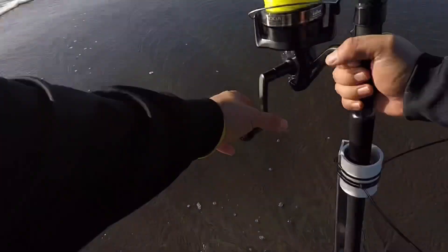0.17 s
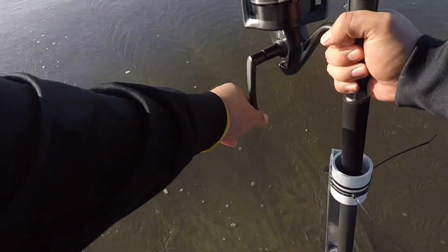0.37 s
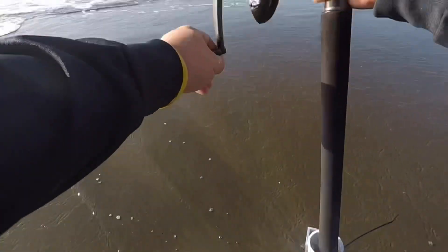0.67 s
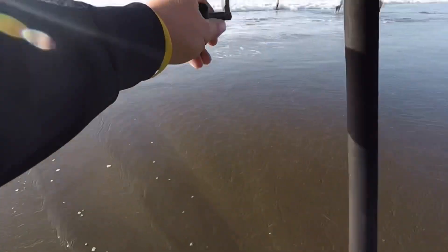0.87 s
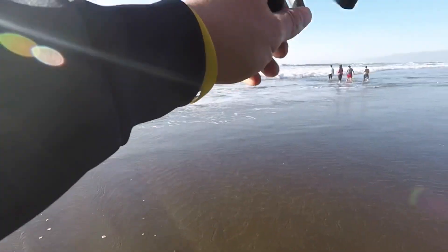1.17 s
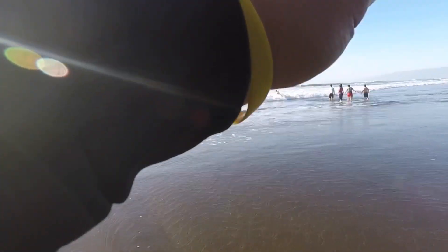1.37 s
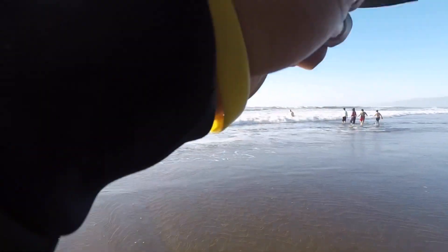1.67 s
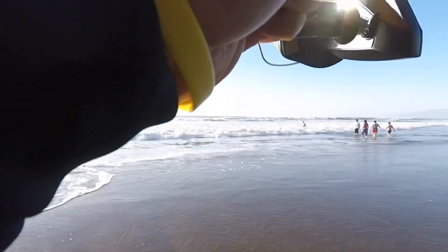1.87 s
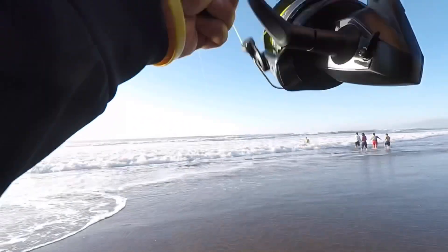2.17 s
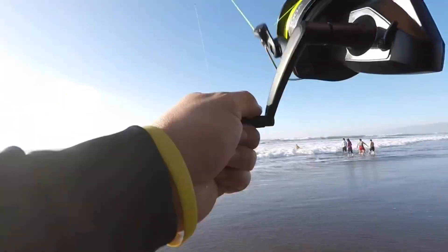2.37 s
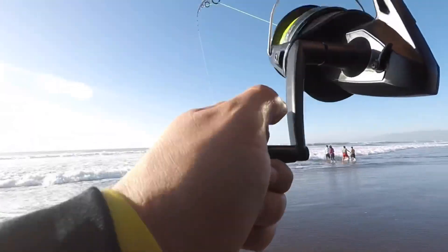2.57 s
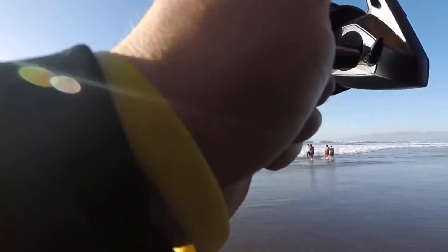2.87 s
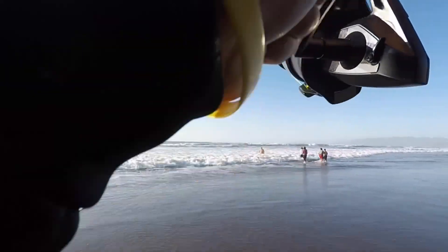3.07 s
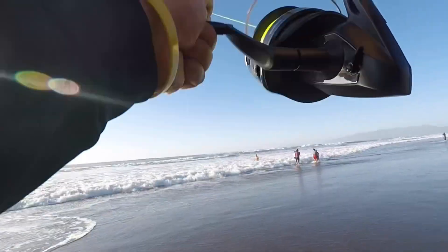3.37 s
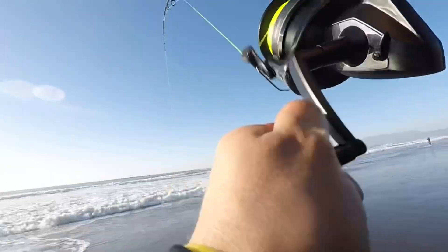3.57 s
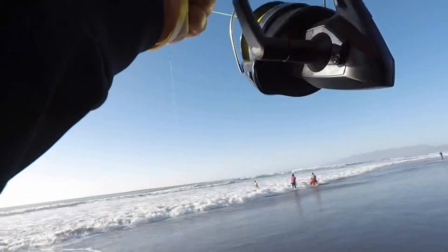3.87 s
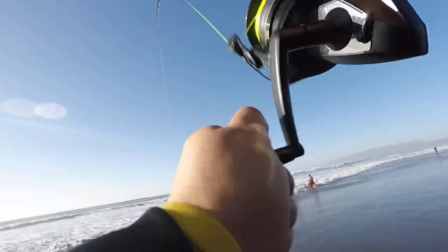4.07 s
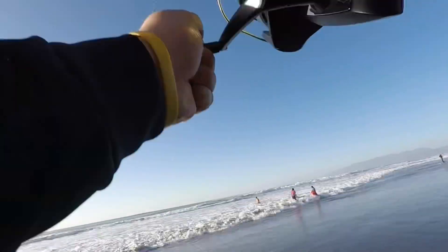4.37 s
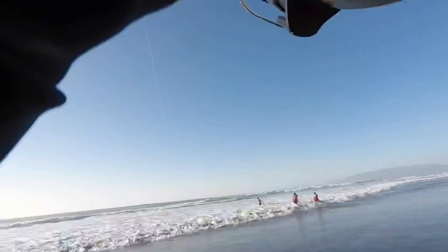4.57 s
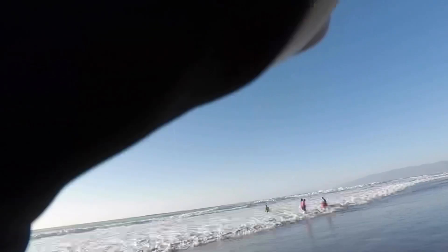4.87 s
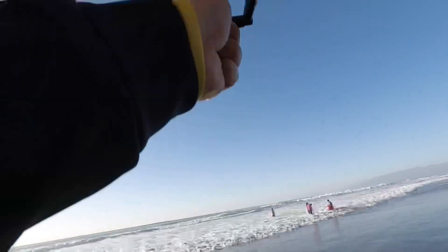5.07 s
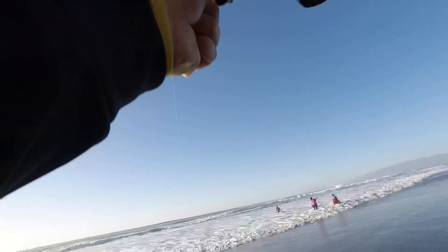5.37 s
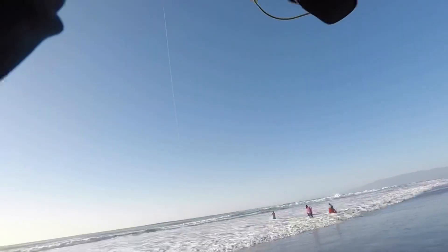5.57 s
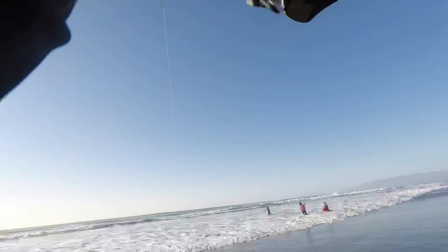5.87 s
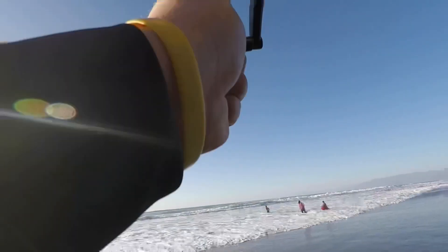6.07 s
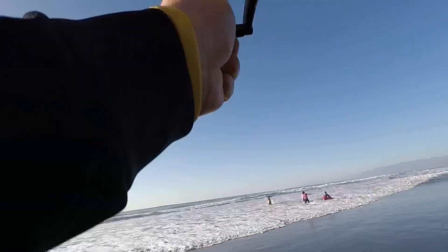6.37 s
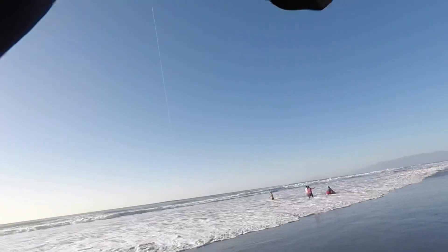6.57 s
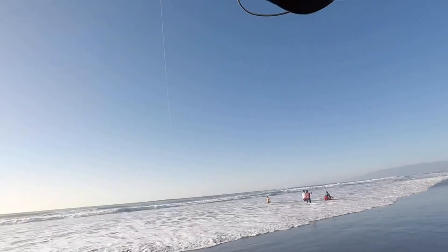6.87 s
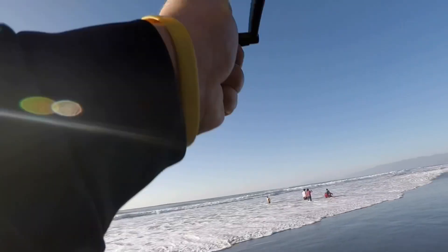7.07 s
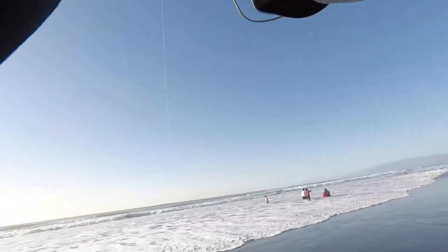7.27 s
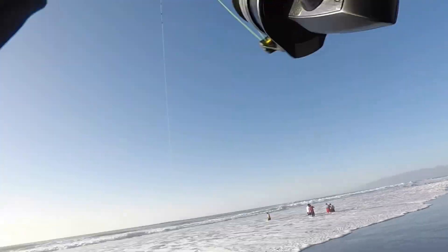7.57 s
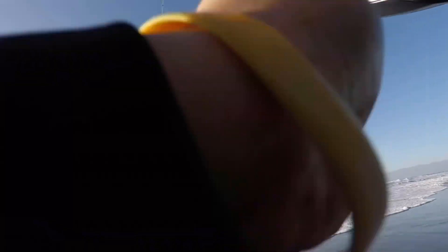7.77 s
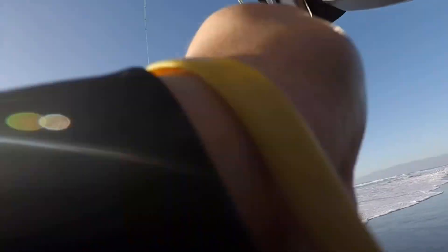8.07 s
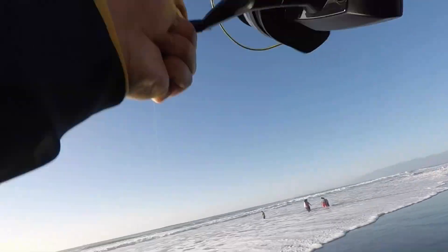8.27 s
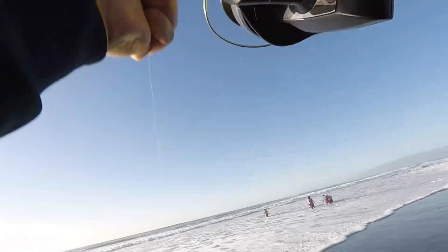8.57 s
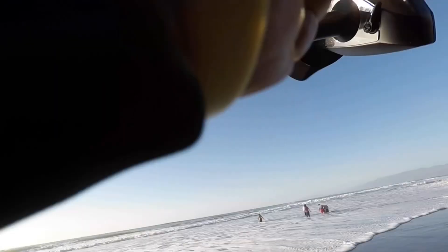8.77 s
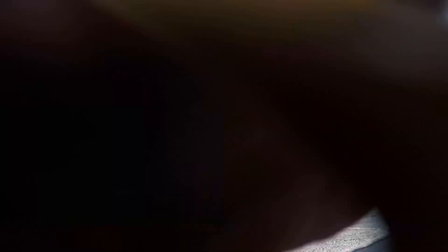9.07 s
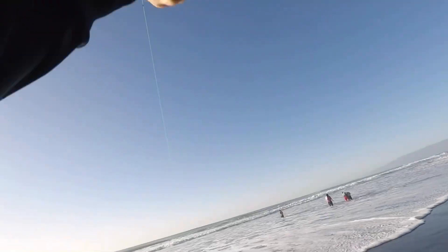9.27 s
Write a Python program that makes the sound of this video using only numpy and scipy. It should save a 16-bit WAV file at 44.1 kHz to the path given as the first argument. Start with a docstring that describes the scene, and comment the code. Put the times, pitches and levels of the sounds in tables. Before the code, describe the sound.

On an open beach, heavy surf roars while wind rumbles on a body-worn microphone. After nearly two seconds a fishing reel very close by begins ticking, bright and uneven, then spins into a fast, hard ratchet rattle. The surf sinks behind it. Later the crank handle clacks and thumps about three times a second, the level dipping briefly after the harder knocks. A tiny squeak, then the clicks slow at the end.

```python
"""A fishing reel is cranked close by: lone ratchet clicks run into a fast rattle, then slow again.
Each tooth is a noise burst that rings the reel's modes; the handle knocks, and the metal squeaks once.
Behind it heavy surf roars on a beach, noise shaped in pitch and level that sinks as the winding goes on.
Wind noise rumbles almost separately on the two ports of a body-worn camera's microphone, low hums glide
early on, one deep puff pushes in, and the whole level drops after the hard knocks and creeps back."""
import sys
import numpy as np
from scipy import signal
from scipy.fft import rfft, irfft
from scipy.io import wavfile
from scipy.ndimage import uniform_filter1d

SR = 44100
rng = np.random.default_rng(int(sys.argv[2]) if len(sys.argv) > 2 else 0)


def master_out(mix):
    """Clip the mix to full scale and print it as 16-bit PCM to the path in sys.argv[1]."""
    frames = np.transpose(np.atleast_2d(mix))
    ceiling = np.clip(frames, -1, 1)
    pcm = np.round(ceiling * 32767).astype(np.int16)
    wavfile.write(sys.argv[1], SR, pcm)


N = 414540  # length in samples

# knocks of the handle: t/s, clack/dB before the mode levels, change per bounce/dB, thump/dB, thump f/Hz,
# drop of the whole level afterwards/dB (negative counts as none)
KNOCKS = [(5.429, -15, -5, -29, 80, 0.5), (6.378, -14.5, -3, -8, 95, 1.66), (7.064, -11, -15, -9, 90, 3),
          (7.385, -11, -8, -12, 85, 2.5), (7.704, -12, -6, -11, 85, 1.3), (8.006, -14, 0, -23, 70, 0),
          (8.019, -10.5, -7, -3, 48, 7), (8.331, -13, -2, -10, 80, 0.5), (8.656, -13, -2.5, -5, 84, -5),
          (8.986, -13.5, -1, -7, 59.3, 1.5)]
TEETH = 15  # on the ratchet wheel
RISE_S = 0.0008  # attack of a click and its ringing


def amp(db):
    """Level in dB to amplitude."""
    return 10 ** (np.asarray(db) / 20)


def unit(x):
    """Scales to an RMS of one."""
    return x / np.sqrt(np.mean(x ** 2) + 1e-20)


def curve(rows):
    """Each column of a table of timed rows, at every sample."""
    s, *columns = np.transpose(rows)
    return [np.interp(np.arange(N) / SR, s, column) for column in columns]


def across(rows, hz):
    """Each column of a table of frequency rows, at the given frequencies on a log scale."""
    f, *columns = np.transpose(rows)
    return [np.interp(np.log(hz + 1), np.log(f + 1), column) for column in columns]


def add(mix, s, sound):
    """Mixes a sound in at a time in seconds."""
    part = mix[..., max(round(s * SR), 0):][..., :sound.shape[-1]]
    part += sound[..., :part.shape[-1]]


def ports(pair, table):
    """Turns two unrelated signals into left and right ports with likeness, phase lead and balance by pitch."""
    a, b = rfft(pair)
    same, lead, balance_db = across(table, np.fft.rfftfreq(N, 1 / SR))
    same = np.clip(same, 0, 1)
    right = same * a + np.sqrt(1 - same ** 2) * b
    right = right * np.exp(-1j * lead)
    return irfft(np.array([a * amp(balance_db / 2), right * amp(-balance_db / 2)]), N)


def churn(spectrum, patchy_db, flicker_db):
    """Two unrelated noises with drifting patches and a quick flicker shared by all pitches."""
    hz, _, z = signal.stft(rng.standard_normal((2, N)), SR, nperseg=2048, noverlap=1536)
    patches = uniform_filter1d(rng.standard_normal(z.shape[1:]), size=12, axis=0)
    patches = uniform_filter1d(patches, size=7, axis=1)
    flicker = rng.standard_normal(z.shape[-1])
    level_db = across(spectrum, hz)[0][:, None] + patchy_db * unit(patches) + flicker_db * flicker
    noise = signal.istft(z * amp(level_db), SR, nperseg=2048, noverlap=1536)[1]
    return unit(noise[:, :N])


def colour(x, spectrum, size=2048):
    """A causal minimum-phase filter of unit energy: attacks stay sharp."""
    log_gain = np.log(amp(across(spectrum, abs(np.fft.fftfreq(size, 1 / SR)))[0]))
    response = np.exp(np.conj(signal.hilbert(log_gain)))
    taps = np.fft.ifft(response).real[:size // 2]
    return signal.oaconvolve(x, taps[None] / np.linalg.norm(taps), axes=1)[:, :N]


def turns():
    """How far the crank has turned at every sample: the hand pushes and pulls, so it surges twice a turn."""
    # steady winding: t/s, speed/(ratchet teeth per s)
    hand_speed = [(3.23, 29.4), (3.44, 37.6), (3.58, 15.7), (3.99, 40.8), (4.22, 36.3), (4.35, 44.6),
                  (5.31, 45.6), (5.75, 50.9), (5.97, 40.2), (6.18, 49.1), (6.49, 47.2), (6.6, 35.4),
                  (6.97, 46.3), (8.0, 48.8), (8.65, 45.8), (8.78, 38.1), (8.85, 48.1), (9.25, 27.0)]
    wind_up_s = 3.227
    surge, surge_at = 0.085, 0.583  # share of the speed; place of a surge in turns
    speed, = curve(hand_speed)
    winding = np.arange(N) / SR >= wind_up_s
    even = np.cumsum(speed * winding) / SR / TEETH
    return even + surge / (4 * np.pi) * np.sin(4 * np.pi * (even - surge_at))


def surf(turn_from_s=1.88, turn_by_s=7.0):
    """The deep roar of the breakers and the brighter wash of their foam, from a direction that slowly shifts."""
    # the breaker dies away, then the sea holds steadier: t/s, roar/dB, foam/dB, both before the layer gains
    swell = [(0, -13.5, -24.5), (1.1, -14, -26.5), (1.35, -16.5, -28), (1.8, -14.5, -27), (3.1, -16, -27.5),
             (4.1, -17.5, -27.5), (4.75, -22, -30), (5.5, -22.5, -31.5), (6.3, -23, -35.5),
             (7.0, -24.5, -37.5), (8.2, -24, -35.5), (9.4, -24.5, -37.5)]
    # noise shapes: f/Hz, relative level per Hz/dB
    roar_shape = [(50, -6.5), (110, -1), (160, 0), (220, -1), (285, 0), (370, -3), (490, -6), (600, -10),
                  (720, -12.5), (1000, -23.5), (1600, -63)]
    foam_shape = [(450, -27), (670, 1), (800, 0), (1020, -0.5), (1300, -4), (1600, -9.5), (2050, -16),
                  (3000, -15.5), (3800, -19.5), (5000, -22.5), (7200, -18), (9500, -26.5), (11000, -35),
                  (15000, -61)]
    # the sea at the ports, facing it and then with the camera turned along the shore:
    # f/Hz, likeness (0-1), lead of the left/rad, left over right/dB
    sea_ports = [(100, .85, -.2, 1), (330, .96, -.1, -1.2), (500, .92, 0, -2), (600, .65, 0, -3.5),
                 (700, .58, 1.1, -2), (850, .5, .7, -1), (1100, .7, 1.2, 1), (1450, .55, 2.5, 3.5),
                 (1800, .15, 1.5, 4), (2500, .55, 0, 1), (3450, .97, 0, 0), (4100, .96, 0, 0),
                 (5000, .4, .7, 0), (7000, .45, 2.2, 0), (9000, .2, 2.5, 0)]
    shore_ports = [(130, .55, -.3, -1), (190, .93, -.2, -1), (240, .85, -.3, -1), (420, .92, -.25, -1.5),
                   (540, .65, -.4, -2.5), (610, .15, 1.2, -4), (700, .65, 2.7, -2), (850, .7, 2.6, -.5),
                   (1050, .45, 1.5, -2), (1300, .55, .6, 1), (1800, .3, 1.3, 1), (2500, .6, 0, 0),
                   (3700, .96, 0, 0), (9000, .2, 1, 0)]
    roar_gain_db, foam_gain_db = 3.0, 2.5
    lean_db = -1  # left over right, added once the camera has turned
    roar_db, foam_db = curve(swell)
    turned, = curve([(turn_from_s, 0), (turn_by_s, 1)])
    out = np.zeros((2, N))
    for share, table in ((1 - turned, sea_ports), (turned, shore_ports)):
        roar = amp(roar_db + roar_gain_db) * churn(roar_shape, patchy_db=0.36, flicker_db=0.1)
        foam = amp(foam_db + foam_gain_db) * churn(foam_shape, patchy_db=1.36, flicker_db=0.8)
        out += np.sqrt(share) * ports(roar + foam, table)
    return out * amp(lean_db * np.array([turned, -turned]) / 2)


def wind(sway_db=1.0, sway_at=0.38, gain_db=6.5):
    """Eddies buffet each port almost separately, and swell as the winding arm swings past."""
    # strength of the wind: t/s, level before the gain/dB
    strength = [(0, -16), (0.3, -49), (0.6, -46), (1.0, -21.5), (1.6, -26.5), (2.1, -44), (2.7, -23.5),
                (3.2, -30), (4.0, -27), (5.0, -22.5), (6.3, -28.5), (7.2, -28), (8.2, -29.5), (8.8, -25.5)]
    # which port the wind favours: t/s, left over right/dB
    favour = [(0, -8), (1.1, 13.5), (4.2, 6.5), (5.7, -2), (7.2, -1), (8.2, -3.5), (9.4, 1)]
    # noise shape: f/Hz, relative level per Hz/dB
    buffet_shape = [(10, 1), (25, -2.5), (60, -2.5), (110, -3.5), (170, -7.5), (260, -16), (600, -37),
                    (1500, -76)]
    # wind at the ports: f/Hz, likeness (0-1), lead of the left/rad, left over right/dB
    wind_ports = [(30, .2, -.5, -.7), (70, .22, -.4, .5), (200, .3, -.2, 0)]
    (wind_db,), (side_db,) = curve(strength), curve(favour)
    arm_db = sway_db * np.cos(2 * np.pi * (turns() - sway_at))
    eddies = amp(wind_db + arm_db + gain_db) * churn(buffet_shape, patchy_db=0.5, flicker_db=2.0)
    return ports(eddies, wind_ports) * amp([side_db / 2, -side_db / 2])


def hums(waver=0.006, flutter=0.08):
    """Two low sine tones glide under the roar and waver in pitch and level."""
    # one table per hum: t/s, f/Hz, level/dB
    hum_tables = [
        [(0, 110, -21), (.25, 107, -20), (.5, 116, -21), (.75, 123, -18), (.95, 118, -22), (1.15, 117, -50)],
        [(.8, 58, -45), (.98, 58, -16), (1.2, 63, -20), (1.5, 66, -17), (1.85, 70, -17), (2.08, 71.5, -18),
         (2.2, 69, -20), (2.35, 66, -50)],
    ]
    t, out = np.arange(N) / SR, np.zeros(N)
    for table in hum_tables:
        hz, db = curve(table)
        wobble, shake = unit(uniform_filter1d(rng.standard_normal((2, N)), size=2000, axis=1))
        sounding = (t >= table[0][0]) & (t < table[-1][0])
        phase = 2 * np.pi * np.cumsum(hz * (1 + waver * wobble)) / SR
        out += amp(db) * sounding * (1 + flutter * shake) * np.sin(phase)
    return out


def teeth(slow_db=-0.5, jitter_s=0.0005):
    """One click as each tooth passes the pawl, a little unevenly, softer when slow: rows of t/s, level/dB."""
    wind_down_s = 9.015
    tooth_db, cruise_teeth_per_s = -24.5, 45  # click level at the usual speed, before the layer gain
    push_db, push_at = 0.64, 0.56  # harder strikes with each push and pull: swing, place in turns
    turn = turns()
    at = np.flatnonzero(np.diff(np.floor(turn * TEETH)) > 0)
    at = at[at < wind_down_s * SR]
    rate = np.diff(turn)[at] * TEETH * SR
    s = at / SR + jitter_s * rng.standard_normal(len(at))
    speed_db = -slow_db * np.log2(rate / cruise_teeth_per_s)  # slow_db is the change at half speed
    hand_db = push_db * np.cos(4 * np.pi * (turn[at] - push_at))
    return np.column_stack([s, tooth_db + speed_db + hand_db])


def pawl(rows, chatter_db, scrape_db, uneven_db, rub_db):
    """The pawl snaps down, chatters until its spring settles it, then rubs and scrapes up the next tooth."""
    snap_s, chatter_s, settle_s = 0.0014, 0.012, 0.0118  # snap decay, chatter decay, end of the chatter
    t, out = np.arange(SR // 30) / SR, np.zeros((2, N))
    noises = rng.standard_normal((len(rows), 2, len(t)))
    chances = rng.standard_normal((len(rows), 4))
    for (s, db, *_), noise, (force, bounce, late, drag) in zip(rows, noises, chances):
        snap = np.exp(-t / snap_s)
        chatter = amp(chatter_db + 1.5 * bounce) * np.exp(-t / chatter_s - (t / settle_s) ** 6)
        scrape = amp(scrape_db + 3 * drag) * np.exp(-((t - 0.015 - 0.002 * late) / 0.002) ** 2)
        rub = amp(rub_db) * (1 - t / t[-1])
        shape = (snap + chatter + scrape + rub) * (1 - np.exp(-t / RISE_S))
        shape /= np.sqrt(np.mean(shape[:SR // 100] ** 2))  # RMS of one over the first 10 ms
        add(out, s, amp(db + uneven_db * force) * shape * noise)
    return out


def pings(rows):
    """The pawl rings on two notes after a lone click, at pitches set by how it meets the tooth."""
    t60_s = 0.042
    t, out = np.arange(SR // 20) / SR, np.zeros(N)
    for s, db, low_hz, low_db, high_hz, high_db in rows:
        low = amp(low_db) * np.sin(2 * np.pi * low_hz * t)
        high = amp(high_db) * np.sin(2 * np.pi * high_hz * t)
        decay = amp(db - 60 * t / t60_s) * (1 - np.exp(-t / RISE_S))
        add(out, s + RISE_S, decay * (low + high))
    return out


def ring(rows):
    """Each click rings the modes of spool and housing, in a mix that changes with the place of the crank."""
    # as the spool slides out and back each mode has its own best place in a turn: f/Hz,
    # level against the click before gain and chance/dB, t60/s, best place/turns, loss half a turn away/dB
    modes = [(1950, -13, .02, 0.56, 30), (2225, -6, 0.036, 0.54, 16), (2490, -15, .024, 0.76, 4),
             (3040, 0, 0.025, 0.77, 14.5), (3654, 1.5, 0.021, 0.23, 12), (4123, -1.5, 0.022, .02, 6),
             (5030, -1, 0.03, 0.72, 13), (5380, -3.5, 0.033, .14, 18), (5800, -0.5, 0.019, 0.5, 35),
             (5830, -3, 0.023, 0.79, 28), (6680, -3, .024, 0.36, 32), (7010, 1, 0.024, 0.82, 26),
             (7240, 2, 0.027, 0.36, 23), (7650, -3, 0.09, 0.42, 9), (8900, -1, 0.018, 0.29, 3.5)]
    gain_db, chance_db = 1.5, 6.5  # chance varies the level from strike to strike
    detune = 1.9  # most cycles gained or lost over one t60
    t, turn, out = np.arange(SR // 24) / SR, turns(), np.zeros((2, N))
    hz, mode_db, t60, place, loss_db = np.transpose(modes)[..., None]
    decay = amp(mode_db - 60 * t / t60) * (1 - np.exp(-t / RISE_S))
    chances = rng.uniform(-0.89, 1, (len(rows), 4, len(modes), 1))
    for (s, db, *_), chance in zip(rows, chances):
        away = np.sin(np.pi * (turn[round(s * SR)] - place)) ** 2
        level = amp(db + gain_db - loss_db * away + chance_db * chance[0])
        # the last two chances give each port its own starting phase
        phase = 2 * np.pi * (hz + detune * chance[1] / t60) * t + np.pi * chance[2:]
        add(out, s, np.sum(level * decay * np.sin(phase), axis=1))
    return out


def whirr(blows, grit_db=2):
    """Gears and line rub on between the clicks: gritty noise that follows the strength of the blows."""
    # how hard the gears rub: t/s, level before a 5 dB cut/dB
    rubbing = [(3.15, 1), (3.25, 8.5), (3.5, 2.5), (3.57, -1), (3.75, 6), (3.9, 4.5), (4.4, 4.5), (6.38, 0),
               (6.43, 1), (6.56, -11), (6.62, 1.5), (8.8, 3), (9.0, 6.5), (9.14, 5.5), (9.28, 1.5)]
    effort = np.sqrt(abs(uniform_filter1d(np.mean(blows ** 2, axis=0), size=3500)))
    grit = unit(uniform_filter1d(rng.standard_normal(N), size=70))
    grit = unit(amp(grit_db * grit))
    return amp(curve(rubbing)[0] - 5) * effort * grit * rng.standard_normal((2, N))


def swing(x):
    """The spool slides out and back once a turn, and the colour rocks between the reel's resonances."""
    # f/Hz, swing/dB, loudest place/turns (quietest where the swing is negative)
    resonances = [(1500, -0.2, 0.38), (2980, 0.6, 0.61), (3500, 2, 0.12), (4400, 0.9, 0.04),
                  (4770, 1, 0.21), (5430, 0.5, 0.19), (6040, 0.5, 0.53), (7000, 3, 0.61), (7700, 1, 0.6),
                  (8950, 1, 0.42), (12000, 0.3, 0.32)]
    hz, s, z = signal.stft(x, SR, nperseg=512)
    depth_db, place = across(resonances, hz)
    turn = np.interp(s * SR, np.arange(N), turns())
    rock = np.cos(2 * np.pi * (turn - place[:, None])) * (turn > 0)
    return signal.istft(z * amp(depth_db[:, None] * rock), SR, nperseg=512)[1][:, :N]


def ratchet(fast_from_s=2.7, fast_by_s=3.5, lone_ring_db=-3):
    """Early clicks are thin and bright; the fast run shakes the housing, and gears clatter under load."""
    # lone clicks as the crank starts and as it slows: t/s, level before the layer gain/dB,
    # low ring f/Hz, its level against the table's click/dB, high ring f/Hz, its level likewise/dB
    lone_clicks = [(1.669, -23, 6000, 2, 7725, 2), (1.8275, -21.5, 4355, 4, 6850, 6),
                   (1.914, -19.5, 4500, 1, 7200, 2), (1.972, -19, 4670, -5, 6900, 3),
                   (2.02, -20.5, 5070, 1, 6900, -3), (2.065, -20.5, 3900, 2, 5670, -3),
                   (2.11, -20.5, 3970, -3, 7550, -14), (2.153, -20.5, 4850, 0, 6800, -16),
                   (2.196, -22, 4600, 3, 7600, -9), (2.241, -22, 5400, -5, 7580, 0),
                   (2.294, -20.5, 4100, -5, 7300, -5), (2.316, -26, 4200, -12, 6800, 8),
                   (2.367, -19.5, 5000, -6, 6700, -2), (2.428, -30, 4300, -10, 6560, -2),
                   (2.508, -20, 4240, 2, 6700, -5), (2.659, -21, 2940, 1, 7150, -13),
                   (2.798, -23, 3840, 0, 6700, -2), (2.934, -24.5, 4340, -9, 6520, 3),
                   (3.047, -21.5, 4400, -10, 7100, 1), (3.12, -22, 4000, -15, 5830, 2),
                   (3.18, -24, 4320, -11, 7240, -7), (9.036, -25, 4300, -3, 7100, -6),
                   (9.064, -23, 4700, -2, 7560, -2), (9.094, -30, 4000, -4, 7100, -5),
                   (9.12, -22, 4200, -1, 7100, -6), (9.144, -24.5, 5000, -2, 7100, -5),
                   (9.17, -23, 5200, 1, 7600, -4), (9.2, -24, 5000, -1, 7140, -4),
                   (9.239, -23, 4400, -4.5, 7640, -1), (9.282, -23.5, 5450, -2, 7100, 0),
                   (9.322, -24, 4200, -3, 6300, 5), (9.357, -24, 5000, -5, 7600, 0),
                   (9.388, -23, 4300, -3, 7100, 2)]
    # noise shapes of early clicks, later clicks, rubbing and loaded gears: f/Hz, relative level per Hz/dB
    slow_shape = [(1200, -13), (2500, -5), (3500, -7.5), (4500, -0.5), (5700, -3), (7200, 1.5), (8500, -3),
                  (10000, -4.5), (11300, -12.5), (13000, -11), (15500, -22)]
    fast_shape = [(700, -13), (1300, -1.5), (2000, -2), (2700, -7), (3600, 2.5), (4200, 1.5), (4650, 0.5),
                  (5200, 3), (6300, -1), (6600, 1), (7300, 5.5), (8300, -4.5), (9600, -3.5), (11300, -13.5),
                  (12500, -10), (15500, -13.5)]
    whirr_shape = [(700, -24), (1400, -3.5), (2300, -3), (3100, 3.5), (3900, -7), (4600, -2), (5100, -5),
                   (6300, 0), (7150, 1.5), (7450, -1), (7660, 5.5), (7950, 1), (9500, -2), (11300, -17.5),
                   (12600, -12), (14600, -19), (15500, -43)]
    clatter_shape = [(1200, -20), (2200, 3), (2600, -3), (3000, 4), (3500, -10), (4200, 10), (4800, -4),
                     (9000, -24)]
    # load on the gears while the spool is run up to speed: t/s, level against the blows/dB
    gear_load = [(3.15, -11), (3.25, -1), (3.48, -9), (3.6, -16), (3.82, -13), (4.0, -12), (4.22, -10),
                 (4.6, -29), (5.2, -43)]
    # the reel at the ports: f/Hz, likeness (0-1), lead of the left/rad, left over right/dB
    reel_ports = [(1200, .6, .5, 0), (1900, .4, .4, 1), (2300, .82, 0, 0), (3100, .985, 0, 0),
                  (3700, .998, 0, 0), (4700, .988, 0, 0), (5200, .94, 0, 0), (6100, .91, .1, 0),
                  (6600, .7, .55, .3), (7400, .55, .9, .7), (8300, .3, -.9, 1), (11000, .25, 0, 1),
                  (13500, .85, 0, .8)]
    run = teeth()
    slow = pawl(lone_clicks, chatter_db=-5, scrape_db=-22, uneven_db=0.2, rub_db=-34)
    fast = pawl(run, chatter_db=-2, scrape_db=-11, uneven_db=0.5, rub_db=-19)
    blows = amp(-2.7) * slow + amp(-1.5) * fast
    share, = curve([(fast_from_s, 0), (fast_by_s, 1)])
    housing = blows * share
    body = colour(blows - housing, slow_shape) + colour(housing, fast_shape)
    body += colour(whirr(housing), whirr_shape)
    clatter = colour(housing * amp(curve(gear_load)[0]), clatter_shape)
    ringing = ring(run) + amp(lone_ring_db) * ring(lone_clicks)
    return ports(swing(body) + clatter + ringing, reel_ports) + pings(lone_clicks)


def gust():
    """A single eddy pushes on both ports: one deep puff."""
    centre_s, length_s, hz, db = 3.7, 0.046, 24.2, -13
    t = np.arange(N) / SR - centre_s
    return -amp(db) * np.exp(-(t / length_s) ** 2) * np.cos(2 * np.pi * hz * t)


def crank(thump_cycles=0.5, bounce_s=0.0068, count=4):
    """Play in the handle gives a dry clack that rattles to rest, and a thump that travels down the rod."""
    # the handle's modes: f/Hz, level/dB against the clack, t60/s
    handle_modes = [(1260, 0.5, 0.0099), (1460, -12, 0.014), (1595, 1.5, 0.016), (1900, -9, 0.019),
                    (2020, -7, 0.012)]
    t, out = np.arange(SR // 8) / SR, np.zeros(N)
    chances = rng.standard_normal((len(KNOCKS), count, 2))
    for (s, clack_db, bounce_db, thump_db, thump_hz, _), chance in zip(KNOCKS, chances):
        age = t * thump_hz / thump_cycles  # one at the peak of the thump
        swell = (age * np.exp(1 - age)) ** 2
        add(out, s, amp(thump_db) * swell * np.cos(2 * np.pi * thump_cycles * (age - 1)))
        for bounce, (pitch, late) in enumerate(chance):
            clack = np.zeros(len(t))
            for k, (hz, db, t60) in enumerate(handle_modes):
                mode = np.sin(2 * np.pi * hz * (1 + 0.025 * pitch) * t)
                clack += (-1) ** k * amp(db - 60 * t / t60) * mode
            clack *= amp(clack_db + bounce * bounce_db) * (1 - np.exp(-t / 0.0017))
            add(out, s + bounce * bounce_s * (1 + 0.158 * late), clack)
    return out


def squeak(length_s=0.0051, rough=0.15, fall_hz_per_s=40000):
    """A very short, harsh, falling chirp of rubbing metal."""
    centre_s, centre_hz, db = 8.994, 4100, -10
    t = np.arange(N) / SR - centre_s
    slip = rough * np.cumsum(rng.standard_normal(N))  # random phase drift
    phase = 2 * np.pi * (centre_hz - fall_hz_per_s * t / 2) * t + slip
    return amp(db) * np.exp(-(t / length_s) ** 2) * np.sin(phase)


def dips():
    """The level of everything falls quickly after each hard knock and creeps back."""
    after_s, fall_s, recover_db_per_s = 0.0082, 0.011, 2.7
    t, down_db = np.arange(N) / SR, np.zeros(N)
    for s, *_, drop_db in KNOCKS:
        down_db += max(drop_db, 0) * np.clip((t - s - after_s) / fall_s, 0, 1)
    down_db -= recover_db_per_s * t
    # the running minimum stops the recovery at full level
    return amp(np.minimum.accumulate(down_db) - down_db)


def scene():
    """The reel in front of sea and wind, all under the same dips in level."""
    background = surf() + wind() + hums() + gust()
    reel = ratchet() + crank() + squeak()
    return (background + reel) * dips()


def record(dry):
    """The loudest peaks clip; then a low-pass takes off the top of the band."""
    low_pass = signal.firwin(151, 15400, window=("kaiser", 9), fs=SR)  # cutoff in Hz
    return signal.oaconvolve(np.clip(dry, -1, 1), low_pass[None], "same")


dry = scene()
out = record(dry)
master_out(out)
```